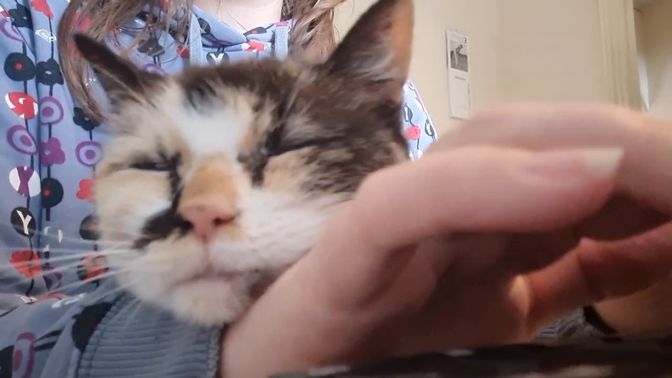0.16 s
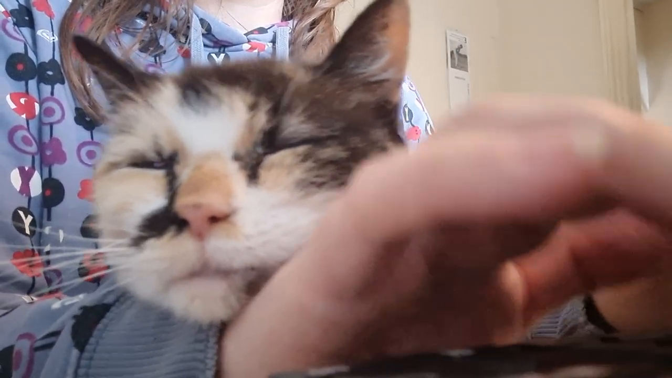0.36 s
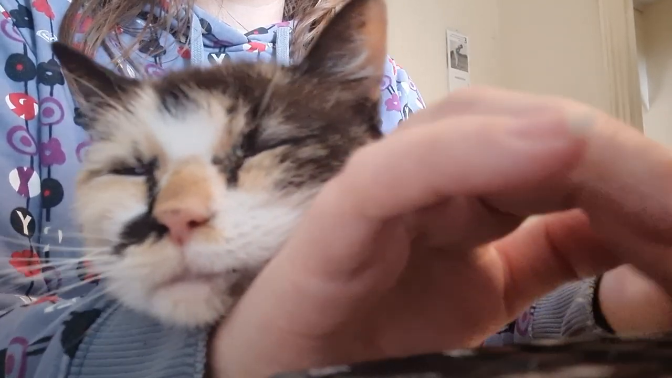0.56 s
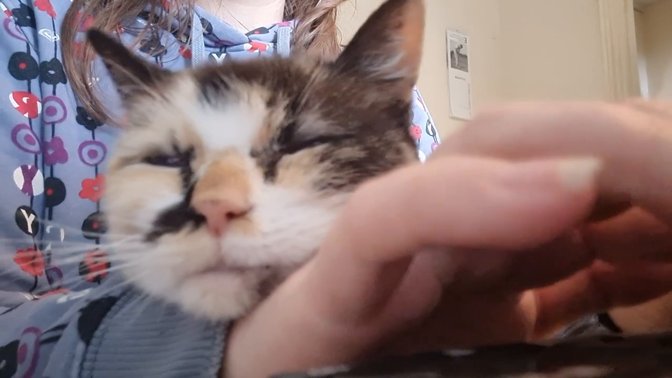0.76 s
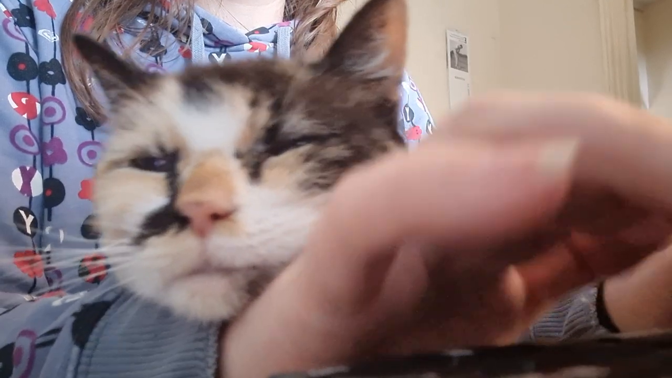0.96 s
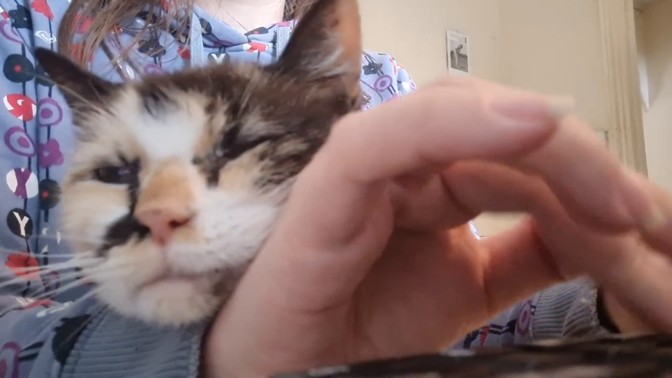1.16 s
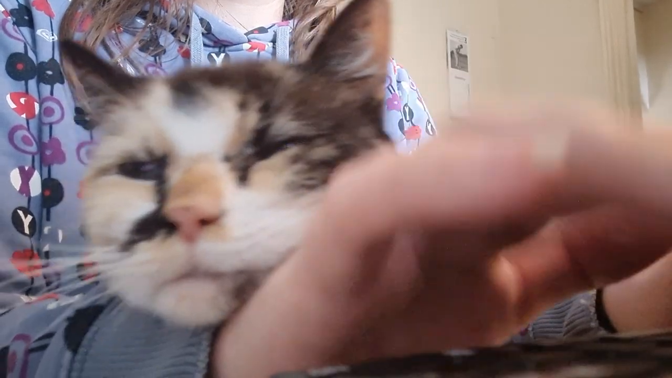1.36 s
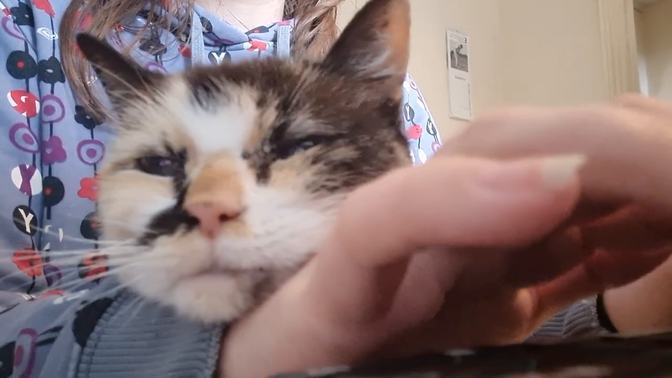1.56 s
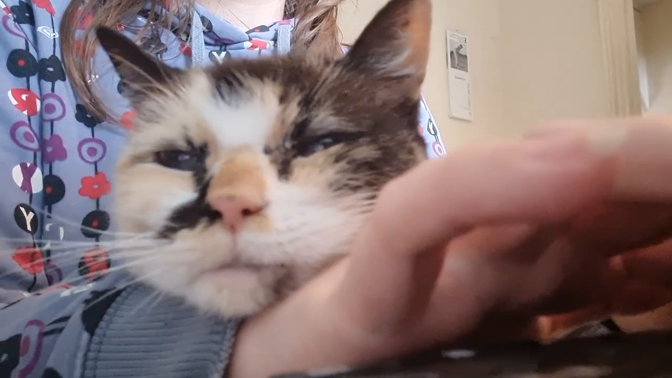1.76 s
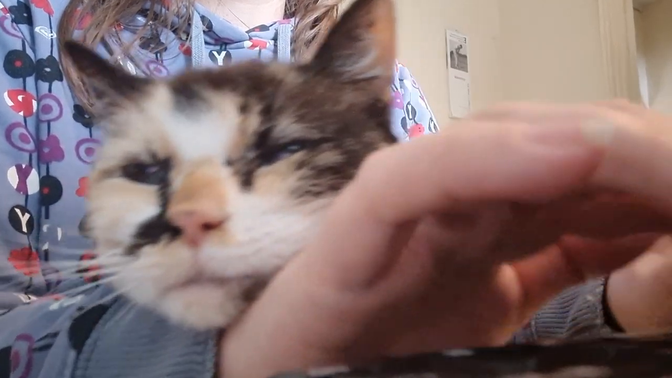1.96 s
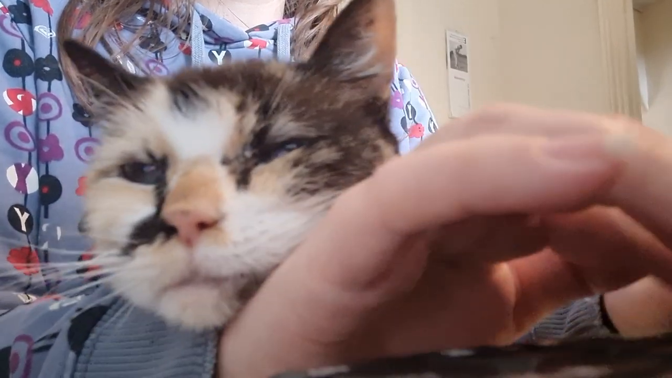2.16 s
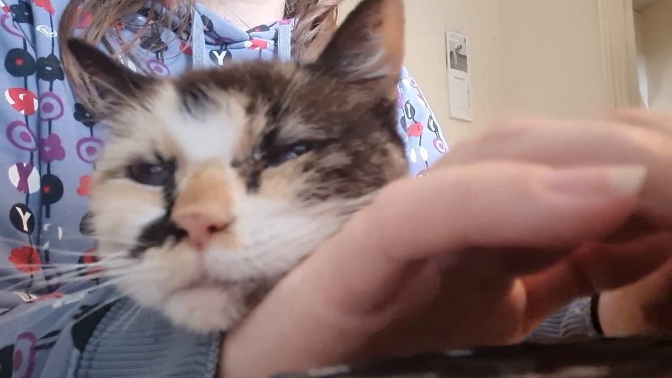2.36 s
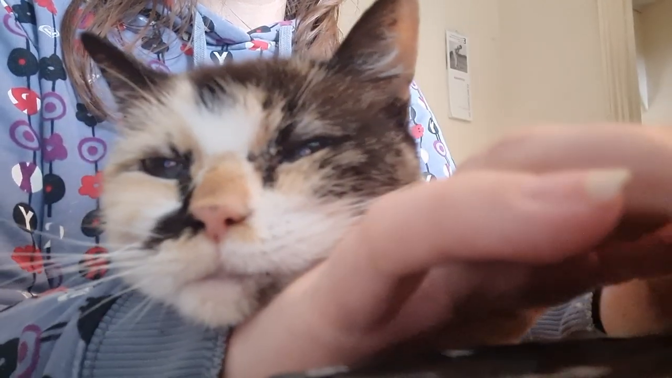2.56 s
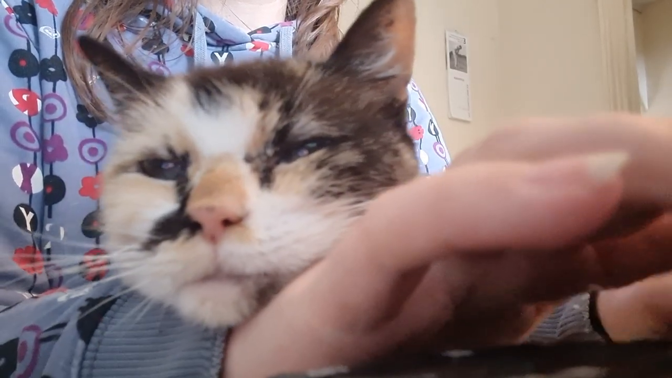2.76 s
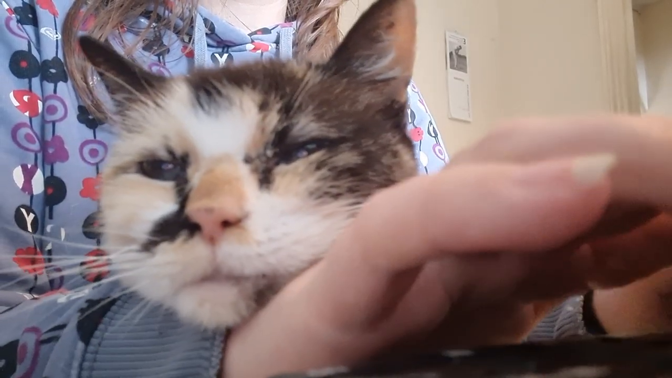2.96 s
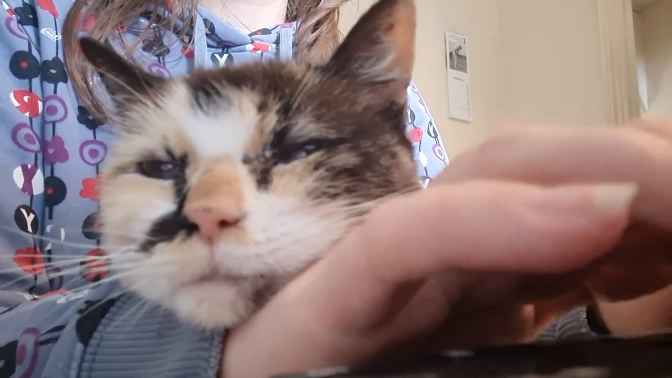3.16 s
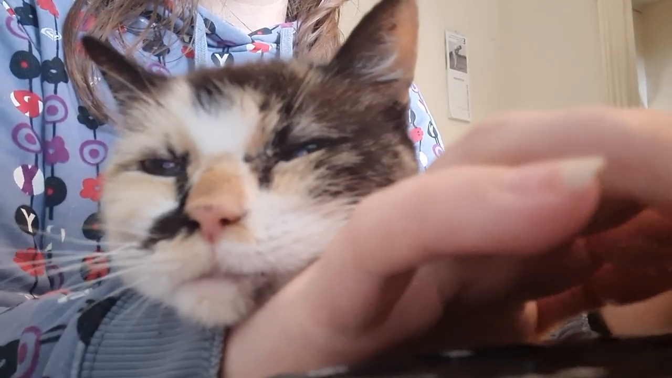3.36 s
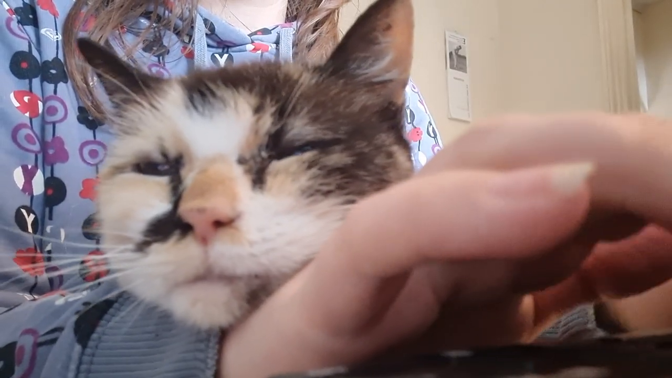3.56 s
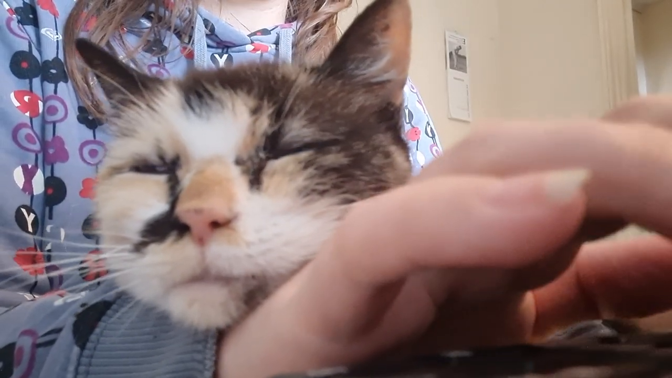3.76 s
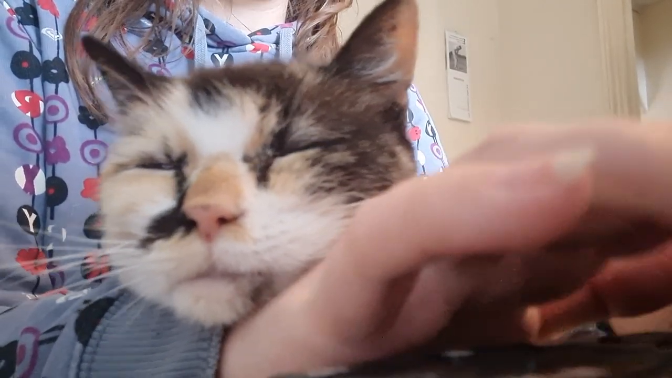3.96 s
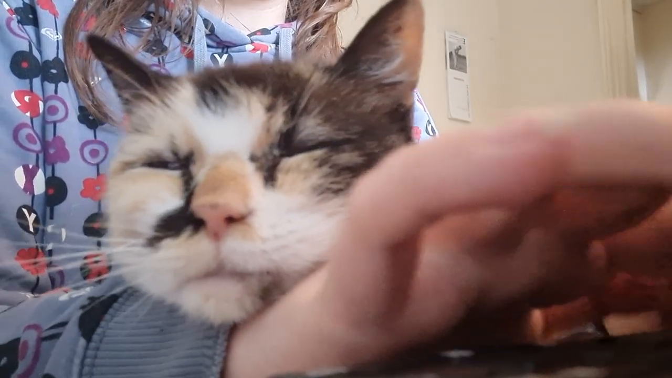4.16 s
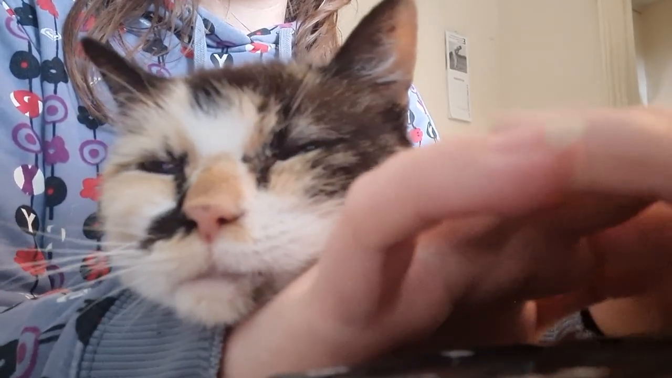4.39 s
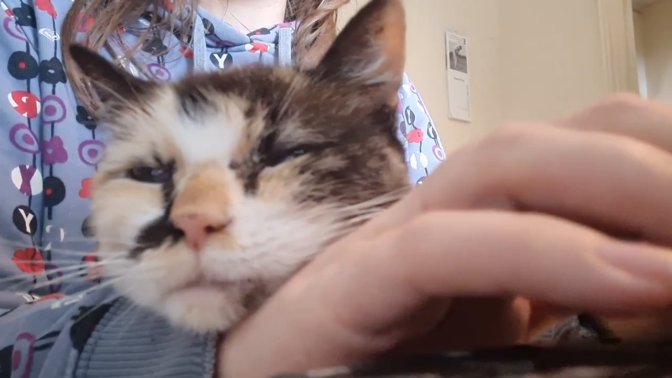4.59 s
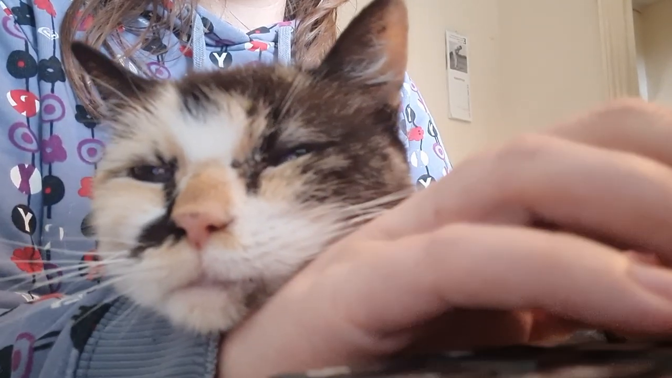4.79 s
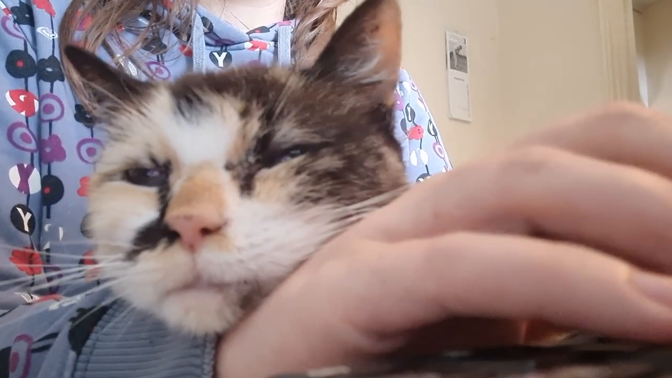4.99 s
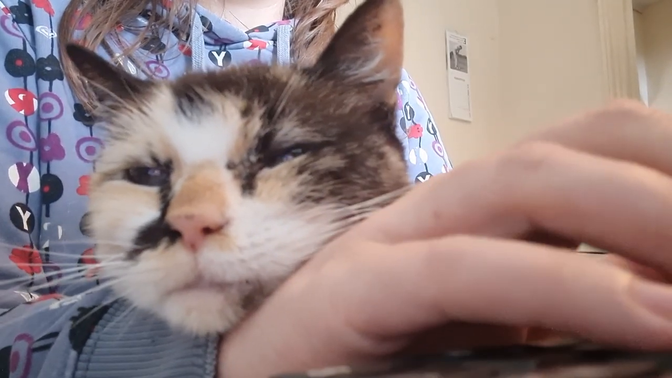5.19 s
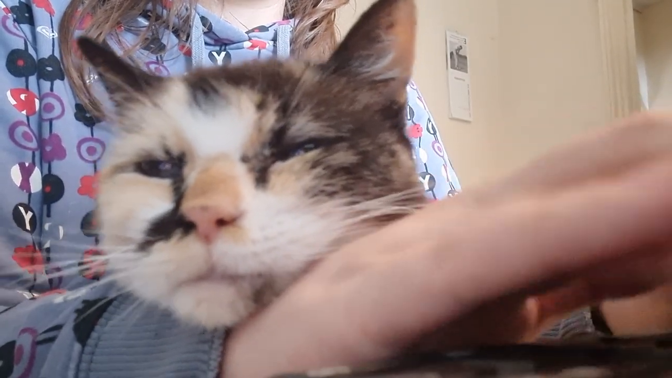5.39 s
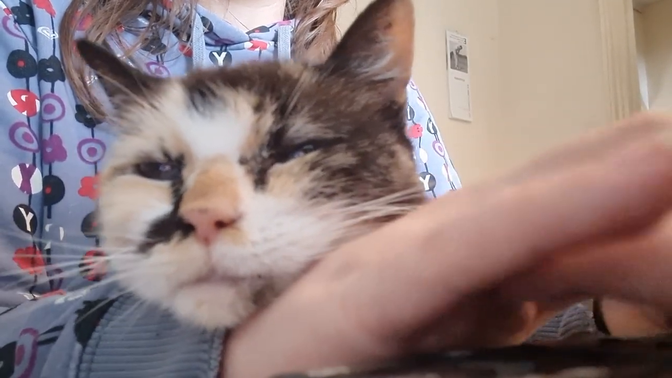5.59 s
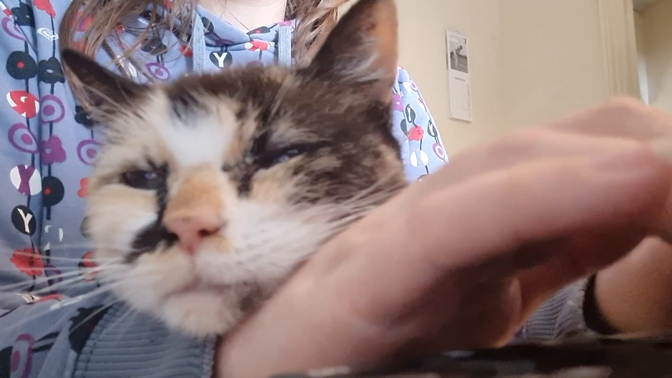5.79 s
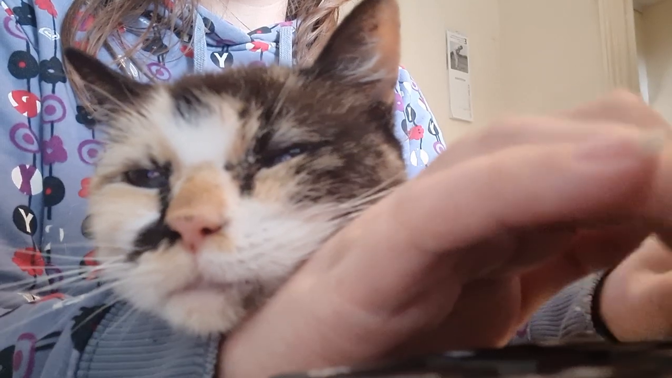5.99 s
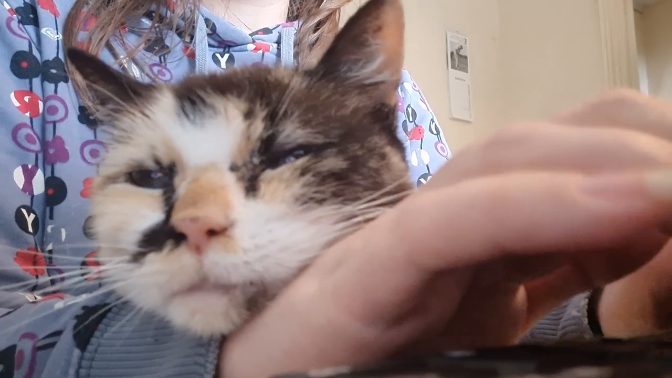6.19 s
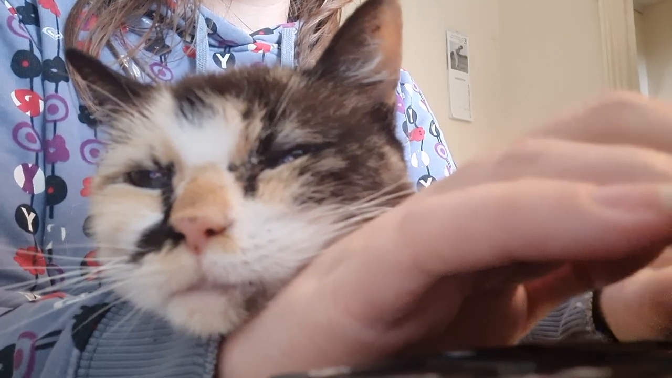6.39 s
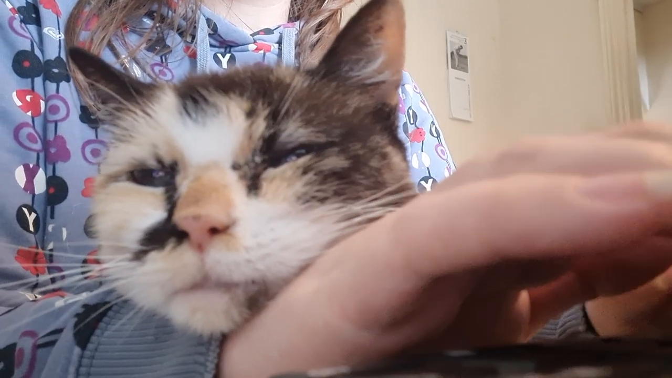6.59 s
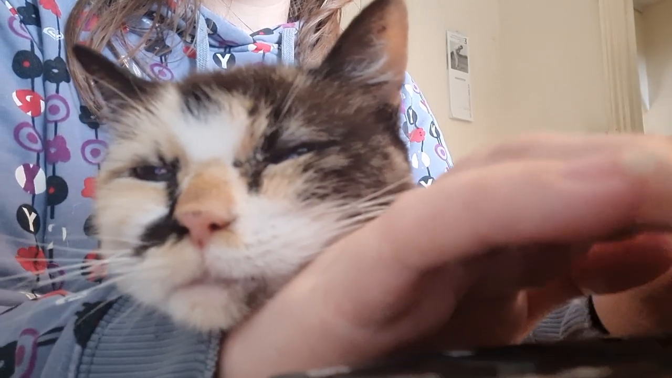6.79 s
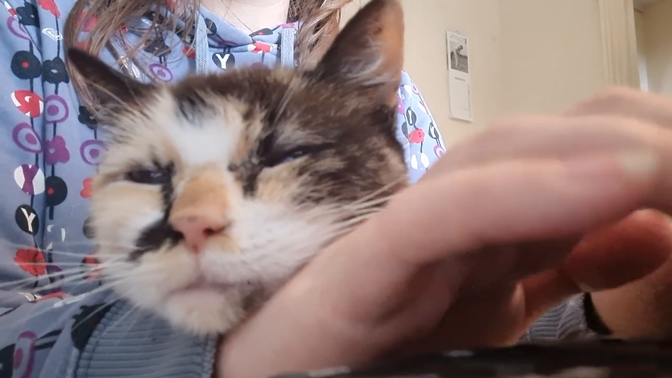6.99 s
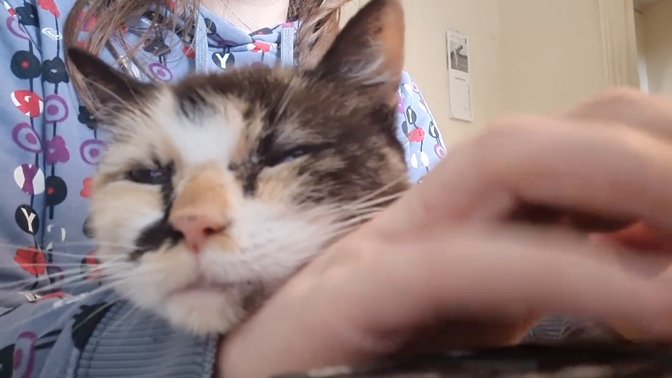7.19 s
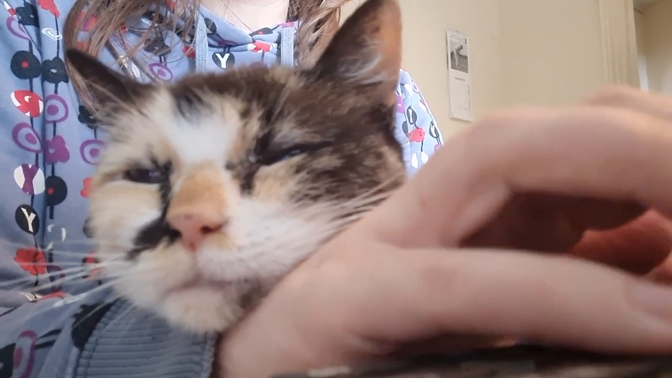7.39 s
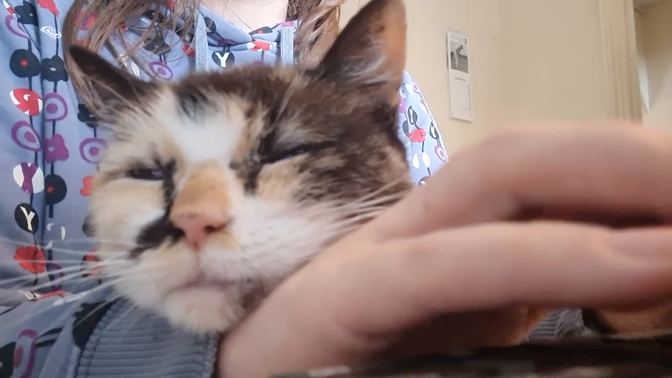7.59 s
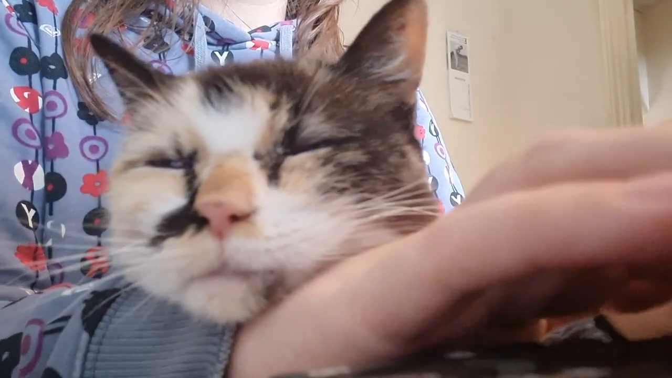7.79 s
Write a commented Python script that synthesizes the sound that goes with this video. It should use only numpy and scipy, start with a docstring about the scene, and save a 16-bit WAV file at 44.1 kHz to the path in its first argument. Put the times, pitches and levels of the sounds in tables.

```python
"""Over the hush of a small room, a cat purrs close by: its vocal folds slap in loud, uneven pops as it
breathes out. Almost at once typing starts on the right: key caps click and rattle, the case rings and
the desk thumps. At 1.3 s the cat breathes in, with faint, even pops. The typing breaks off near 3 s,
then picks up as the cat breathes out again from 3.4 s. Both ease off near 5 s. The keys return at
5.5 s, pause as a last out-breath begins at 7 s, and join it to the end."""
import sys
import numpy as np
from scipy import signal
from scipy.fft import rfft, irfft
from scipy.io import wavfile

SR = 44100
rng = np.random.default_rng(int(sys.argv[2]) if len(sys.argv) > 2 else 0)


def unload_wav(signal):
    """Save mono or channel-first audio to the path in sys.argv[1] as 16-bit WAV at rate SR, clipped to [-1, 1]."""
    wavfile.write(
        sys.argv[1],
        SR,
        np.round(np.clip(np.atleast_2d(signal).T, -1, 1) * 32767).astype(np.int16),
    )


N = 345744
TIME = np.arange(N) / SR

# The tone of the background noise. Each row: frequency in Hz, relative level in dB.
HUSH_SPECTRUM = [(18, -31.5), (30, -1.5), (53, -2.5), (88, -3), (141, -1), (239, -8.5), (649, -23),
                 (1160, -31), (2010, -41), (2230, -31), (5170, -33), (14800, -30), (16000, -36.5)]
# How fast the cat's voice box twitches. Each row: start in seconds, twitches per second.
TWITCH_RATES = [(0, 26.67), (.7, 25.07), (.84, 27.29), (1.26, 25.81), (3.08, 26.39), (4.62, 25.52),
                (5.46, 25.47), (7.0, 27.38), (7.42, 26.0)]
# The cat's out-breaths. Each row: start, swell time, start of fade and fade time, all in seconds,
# then relative level in dB.
OUT_BREATHS = [(.02, .06, 1.08, .22, -42), (3.4, .33, 4.9, .03, -41.5), (7.035, .02, 7.9, .03, -43)]
# How the cat's airways ring. Each row: pitch in Hz, width in Hz, relative level in dB.
THROAT_MODES = [(154, 160, -1), (240, 265, 6.5), (482, 910, -3.5)]
MOUTH_MODES = [(766, 129, -21), (1253, 270, -12)]
NOSE_MODES = [(6590, 610, -33)]
# Key contacts. Each row: time in seconds, click level in dB, cap pitch in Hz, then the levels of
# stem, case and desk thump in dB. Levels are relative within each column.
KEY_CONTACTS = [(0.0372, -42.5, 1340, -69, -50, -47), (0.0705, -43, 1200, -71, -42, -54.5),
                (0.2328, -47, 1210, -70, -46, -53), (0.2533, -30.5, 1410, -44, -42, -45),
                (0.3224, -43, 1770, -61, -71, -53), (0.3324, -41, 1280, -82, -51, -48.5),
                (0.3945, -44.5, 2700, -60, -56, -57.5), (0.4478, -33.5, 2000, -55, -46, -64),
                (0.539, -49.5, 2900, -68, -60, -54), (0.5642, -47.5, 1830, -75, -67, -43),
                (0.5943, -35.5, 2680, -60, -52, -57), (0.6674, -48, 3020, -71, -60, -41),
                (0.6811, -38.5, 1810, -61, -60, -42.5), (0.7032, -46.5, 2840, -63, -63, -44),
                (0.7967, -39.5, 1200, -50.5, -42.5, -51), (0.8346, -26, 4130, -38, -35.5, -53),
                (0.915, -25.5, 3040, -41, -45, -55), (0.9485, -29.5, 2530, -44, -33.5, -50),
                (0.9822, -47, 1380, -56, -57, -53), (1.0429, -37, 1700, -60, -57, -55),
                (1.0518, -30, 1960, -47.5, -48, -61), (1.2253, -38.5, 1330, -46.5, -44.5, -50),
                (1.275, -25.5, 1910, -33.5, -45, -46), (1.287, -32, 1540, -37, -58, -47),
                (1.3403, -43, 1490, -44, -53, -55), (1.3603, -38.5, 2680, -58, -49.5, -50),
                (1.3721, -33.5, 2980, -37, -39.5, -55.5), (1.3871, -43, 2940, -58, -59, -64),
                (1.474, -23.5, 2460, -40, -37, -45), (1.5493, -30, 2900, -60, -47, -60),
                (1.5864, -29.5, 1300, -53, -46, -47), (1.606, -35, 2020, -55, -61, -58),
                (1.6508, -40, 2660, -59, -43, -52), (1.6652, -31, 2360, -49, -60, -68),
                (1.738, -46.5, 2360, -61, -64, -51), (1.7731, -31.5, 1900, -64, -47, -47),
                (1.8045, -30, 2730, -48, -54, -55), (1.8457, -33.5, 2900, -61, -56, -46),
                (1.934, -42, 1490, -59, -56, -45.5), (1.9681, -43.5, 2560, -63, -62, -55),
                (2.032, -48, 1610, -57, -58, -62), (2.0478, -38.5, 1550, -55, -54, -55.5),
                (2.0911, -34, 2740, -66, -53, -50.5), (2.136, -39.5, 1250, -53.5, -60, -53),
                (2.1688, -38, 1320, -45, -59, -53), (2.1856, -38, 2210, -54, -58, -49),
                (2.2802, -39.5, 1260, -63, -52, -45), (2.2922, -39.5, 1950, -45.5, -50.5, -43.5),
                (2.3805, -59.5, 1940, -61, -63, -56), (2.3997, -45.5, 1750, -55, -66, -53.5),
                (2.4501, -32.5, 2930, -40.5, -39.5, -45.5), (2.553, -42.5, 2600, -59, -58, -53),
                (2.595, -35, 1440, -54, -50, -62), (2.6322, -30, 2650, -59, -41, -48.5),
                (2.6696, -33, 1240, -41, -46, -43), (2.6981, -27, 2280, -38, -41.5, -45),
                (2.734, -33.5, 2500, -47, -55, -44), (2.7538, -36.5, 2020, -52, -67, -62),
                (2.771, -46, 2220, -74, -64, -54), (2.8305, -37.5, 2210, -52, -64, -53),
                (2.8397, -34.5, 1580, -51, -62, -48), (2.929, -33.5, 1350, -40, -39, -54),
                (2.942, -33, 3020, -37, -50, -59), (2.9594, -42.5, 2940, -41.5, -52, -51),
                (3.2685, -73, 1260, -92, -73, -79), (3.329, -51, 1910, -76, -71, -64),
                (3.342, -36, 2640, -54, -48.5, -51), (3.4338, -44, 1950, -59, -59, -58),
                (3.4504, -33.5, 1670, -49, -52, -54), (3.5248, -33.5, 2890, -59, -59, -63),
                (3.8905, -39, 1210, -58, -59, -62), (3.93, -53, 1270, -67, -44, -50.5),
                (3.961, -33.5, 1210, -63, -50, -51), (4.0617, -37.5, 1850, -56, -55, -57),
                (4.0826, -30.5, 1900, -50, -52, -60), (4.1346, -23.5, 2960, -43.5, -41, -51),
                (4.1694, -32.5, 2930, -50, -55, -48), (4.2233, -34, 1910, -55, -51, -54),
                (4.2423, -30, 1340, -44.5, -36, -44.5), (4.3116, -47, 1220, -59, -44, -57),
                (4.3562, -29, 1670, -41, -51, -51), (4.3836, -43, 2290, -61, -49, -54),
                (4.4497, -23, 3500, -32.5, -40, -62), (4.4962, -41, 1290, -54, -43, -56),
                (4.5362, -46, 2000, -57, -48, -55), (4.5466, -41, 2680, -47, -55, -51),
                (4.6782, -23, 2170, -34, -44, -57), (4.7767, -40, 1430, -48, -41, -44),
                (4.794, -34, 2070, -42, -42, -50), (4.8051, -32.5, 1660, -46, -50, -55),
                (4.8491, -22.5, 3000, -42.5, -40, -62), (4.8708, -37.5, 2840, -56, -60, -58),
                (4.8888, -42, 2910, -57, -49, -63.5), (4.9016, -33.5, 1680, -48, -51, -51),
                (4.9169, -31.5, 1750, -49, -34.5, -53), (4.9228, -26.5, 2930, -26, -53, -51),
                (4.9398, -38.5, 1460, -38, -50, -60), (4.9567, -41, 1725, -58, -50.5, -59.5),
                (5.252, -77, 2190, -92, -88, -77), (5.3652, -67.5, 1970, -91.5, -84, -80),
                (5.5084, -39, 2460, -52, -53, -79), (5.5672, -32.5, 2840, -58, -49, -52),
                (5.6009, -48, 1400, -60, -47, -55), (5.6368, -26, 2010, -43, -55, -44),
                (5.674, -37, 2960, -51, -53, -53), (5.691, -29, 1480, -49.5, -45.5, -53),
                (5.7329, -39.5, 2340, -54.5, -53, -64), (5.7447, -36, 2100, -42, -57, -50),
                (5.7906, -52.5, 2160, -61, -57, -55), (5.8838, -26, 2640, -37, -33.5, -51),
                (5.915, -34, 1350, -54, -47, -48), (5.9395, -29.5, 1930, -43, -52, -53),
                (5.9698, -33.5, 1980, -49, -46, -56), (5.9998, -29.5, 2140, -56, -45, -52),
                (6.0175, -28, 2700, -37.5, -45, -49.5), (6.0445, -43.5, 2000, -53, -51, -48.5),
                (6.0975, -39.5, 2760, -55, -65, -52), (6.1723, -26.5, 2920, -42.5, -36, -56),
                (6.2018, -26.5, 1200, -39, -51, -42), (6.2797, -43.5, 1960, -57, -61, -56),
                (6.3228, -33, 2330, -47, -55, -53), (6.3847, -39.5, 1390, -44, -52, -42),
                (6.4065, -22.5, 2020, -35.5, -34.5, -46), (6.4301, -41, 2860, -54, -56, -49),
                (6.4658, -37.5, 2050, -45.5, -37, -50), (6.5151, -32.5, 2160, -42.5, -45, -59),
                (6.551, -44.5, 2120, -53, -51, -63), (6.5738, -29, 1390, -38, -37.5, -49),
                (6.5942, -45, 1740, -45, -56, -53), (6.653, -21.5, 2790, -32, -46, -40.5),
                (6.6782, -35, 2600, -58, -50, -54), (6.6917, -39, 2050, -42.5, -46, -54.5),
                (6.7267, -48, 1630, -65, -67, -61), (6.7394, -35, 1490, -55, -59, -57),
                (6.7522, -34, 2820, -57, -49, -64), (6.7935, -36.5, 1370, -49, -59, -52.5),
                (6.8671, -44, 1740, -62, -62, -68), (6.8851, -44.5, 2470, -60, -60.5, -68.5),
                (6.9293, -66.5, 2880, -81, -72, -80), (7.2078, -52.5, 1520, -58, -47.5, -43),
                (7.224, -34, 1660, -47, -44, -47), (7.3081, -28, 1260, -45.5, -50, -54),
                (7.339, -32, 2870, -45, -44, -48), (7.3567, -37, 1200, -53, -48, -51),
                (7.4226, -23, 2880, -41, -50, -59), (7.446, -31.5, 2130, -51, -53, -48),
                (7.4575, -29.5, 2700, -38.5, -38, -52), (7.5226, -49, 1860, -59, -62, -50),
                (7.5322, -39, 1200, -51.5, -47, -51), (7.665, -28.5, 1260, -49, -55, -44),
                (7.6831, -23.5, 1530, -45, -50, -37), (7.697, -34.5, 2969, -60, -49, -55),
                (7.7531, -34, 2710, -47, -63, -53), (7.7694, -38.5, 1310, -59, -52, -52),
                (7.797, -30.5, 1290, -49, -45.5, -39), (7.8115, -29, 2080, -40.5, -42.5, -35)]
# How keyboard parts and desk ring. Each row: pitch in Hz, width in Hz, relative level in dB.
CAP_MODES = [(1990, 840, 4.5), (2430, 970, 3.5), (2800, 464, 0.5), (3860, 810, -1.5), (4077, 690, -3.5)]
CASE_MODES = [(538, 180, 0.5), (715, 120, -2.5), (1060, 560, 0.5), (1273, 226, 0.5), (1370, 350, -1.5)]
STEM_MODES = [(4880, 590, -7.5), (6600, 1000, -7.5), (7950, 1300, 2), (9800, 4100, 3), (10250, 2200, 4),
              (14400, 3800, 3), (15600, 1400, -3)]
DESK_MODES = [(52, 17, -1), (116, 21, 2), (141, 23, -6.5), (243.6, 29, -0.5)]
# When the hands are busy. Each row: start in seconds, end in seconds, relative rustle level in dB.
TYPING_RUNS = [(0.194, 1.1, -66.5), (1.22, 2.951, -64), (3.324, 3.58, -77), (3.87, 4.934, -65),
               (5.61, 6.807, -62), (7.203, 7.9, -68.5)]


def amp(db):
    """Turn decibels into a number to multiply by."""
    return 10 ** (np.asarray(db) / 20)


def resonance(x, hz, width_hz):
    """Ring at one pitch; the narrower the width, the longer the ring."""
    decay, angle = np.exp(-np.pi * width_hz / SR), 2 * np.pi * hz / SR
    return signal.lfilter([0, np.sin(angle)], [1, -2 * decay * np.cos(angle), decay ** 2], x + 1e-18)


def body(x, modes):
    """An object rings at several pitches, its modes; every second one is added upside down."""
    return sum((-1) ** k * amp(db) * resonance(x, hz, width) for k, (hz, width, db) in enumerate(modes))


def touched(hit, modes, spread_db):
    """Ring the modes with random strengths, keeping the total energy of the hit."""
    rung = body(hit, [(hz, width, db + spread_db * rng.standard_normal()) for hz, width, db in modes])
    return rung * np.sqrt(np.sum(hit ** 2, axis=1) / np.sum(rung ** 2, axis=1))[:, None]


def cut(x, hz, kind, order):
    """Keep the "low" or the "high" side of a frequency."""
    return signal.sosfilt(signal.butter(order, hz, kind, fs=SR, output="sos"), x)


def add(out, at_s, piece):
    """Mix a short piece in at a given time."""
    i = max(round(at_s * SR), 0)
    out[..., i:i + piece.shape[-1]] += piece[..., :max(N - i, 0)]


def burst(rise_s, grain_db):
    """A puff of grainy stereo noise that swells over the rise time and dies away."""
    age = np.arange(2400) / SR / rise_s
    noise = rng.standard_normal((2, len(age))) * amp(grain_db * np.repeat(rng.standard_normal(100), 24))
    return noise / np.sqrt(np.mean(noise ** 2)) * (age * np.exp(1 - age)) ** 4


def hush():
    """Steady room and microphone noise, partly shared by left and right."""
    hz, db = np.transpose(HUSH_SPECTRUM)
    gain = amp(np.interp(np.log(np.fft.rfftfreq(N, 1 / SR) + 1), np.log(hz), db))
    shared, side = irfft(rfft(rng.standard_normal((2, N))) * gain, N)
    return amp(-79) / np.std(shared) * (shared * amp([[-1.5], [1.5]]) + 0.95 * side * [[1], [-1]])


def fold_pops(times_s, jitter_s, db, spread_db):
    """The vocal folds slap: one spike for each time, a little uneven in timing and strength."""
    timing, strength = rng.standard_normal((2, len(times_s)))
    at = ((times_s + jitter_s * timing) * SR).astype(int)
    pops = np.zeros(N)
    pops[np.clip(at, 0, N - 1)] = amp(db + spread_db * strength)
    return pops


def out_breaths(waver_db=1.5, wavers_per_s=12):
    """How hard the cat breathes out: each breath swells, holds and fades, wavering slightly."""
    effort = np.zeros(N)
    for start, swell, fade_at, fade, db in OUT_BREATHS:
        end = fade_at + fade
        shape_db = np.interp(TIME, [start, start + swell, fade_at, end], [-8.5, 0, 0, -13.5])
        effort += amp(db + shape_db) * (TIME > start) * (TIME < end)
    waver = np.interp(TIME, np.arange(200) / wavers_per_s, rng.standard_normal(200))
    return effort * amp(waver_db * waver)


def purr():
    """Each twitch of the voice box lets the folds slap, ringing the throat, mouth and nose."""
    starts, rates = np.transpose(TWITCH_RATES)
    cycles = np.cumsum(rates[np.searchsorted(starts, TIME, "right") - 1]) / SR
    twitch_s = .005 + np.interp(np.arange(int(cycles[-1])), cycles, TIME)
    main = fold_pops(twitch_s, jitter_s=.0018, db=0, spread_db=3.5)
    early = fold_pops(twitch_s - .011, jitter_s=.003, db=-6.5, spread_db=5)
    stray = fold_pops(twitch_s + .012, jitter_s=.008, db=-12, spread_db=5)
    pops, effort = main + early + stray, out_breaths()
    flutter = amp(-39.5) * rng.standard_normal(N)  # air slips through the half-shut folds
    # Faint main pops never stop: they are the purr heard on the in-breath.
    pressure = amp(16) * effort * (pops + flutter) + amp(-62) * (main + flutter)
    slap = effort * (pops + 0.32 * flutter) + amp(-71) * main
    # The sharp slap falls in the middle of the slower pressure swing, no two alike.
    slap = amp(13 + 2.2 * rng.standard_normal(N)) * np.roll(slap, 55)
    throat = cut(cut(body(pressure, THROAT_MODES), 91, "high", order=2), 430, "low", order=2)
    mouth = cut(body(slap, MOUTH_MODES), 1400, "low", order=3)
    nose = cut(body(slap, NOSE_MODES), 5000, "high", order=2)
    return throat + mouth + nose


def keyboard(usual_click_db=-35, usual_rise_s=.00245):
    """Each contact shakes its own cap, nearby caps, stems and case; loose keys rattle after it."""
    clicks, loose = np.zeros((2, 2, N))
    for at_s, click_db, cap_hz, stem_db, case_db, _ in KEY_CONTACTS:
        pan, length = rng.standard_normal(2)
        sides = amp(np.array([[.5], [-.5]]) * (-11 + 4.5 * pan))  # louder on the right
        force_db = click_db - usual_click_db
        rise_s = usual_rise_s * np.exp(.3 * length - .0117 * force_db)  # harder blows are shorter
        lands_s = at_s + .0012 - rise_s
        hit = burst(rise_s, grain_db=2)
        lag = rng.integers(14, 46)  # samples: sound reaches the left late, around the case
        hit[0] = 0.68 * np.roll(hit[1], lag) + 0.91 * hit[0]
        hit *= sides
        caps = amp(click_db - 5) * touched(hit, [(cap_hz, 550, 13)] + CAP_MODES, spread_db=5.5)
        case = amp(case_db + 2.5) * touched(hit, CASE_MODES, spread_db=3.5)
        stem = amp(stem_db - 3) * touched(hit, STEM_MODES, spread_db=4.5)
        add(clicks, lands_s, caps + case)
        add(clicks, lands_s - .0007, stem)  # the stem scrapes just before the cap lands
        shake = amp(-54.5 + .69 * force_db) * burst(.012, grain_db=6)
        lead_in = amp(click_db - 21.5) * burst(.0099, grain_db=.5)
        add(loose, at_s - .003, sides * shake)
        add(loose, at_s - .009, sides * lead_in)  # a faint hiss swells just before each click
    rattle = amp(-2.5) * touched(loose, CAP_MODES, spread_db=2)
    rattle += amp(-6.5) * touched(loose, CASE_MODES, spread_db=4.5)
    rattle += amp(-14) * touched(loose, STEM_MODES, spread_db=10.5)
    return clicks + rattle


def desk_thumps():
    """The finger behind each contact pushes the desk top softly and unevenly."""
    push = np.zeros((2, N))
    for at_s, *_, thump_db in KEY_CONTACTS:
        add(push, at_s - .004, amp(thump_db - 25.5) * burst(.011, grain_db=5.5))
    ringing = body(cut(push, 390, "low", order=2), DESK_MODES)
    near, far = cut(ringing, 39, "high", order=4)
    return np.array([amp(-8) * near + amp(-19) * far, amp(7.5) * near])


def hand_rustle(rest_db=-87, brushes_per_s=7.8):
    """Shifting hands and light, random brushes stir the caps, case and stems without a click."""
    busy_db = np.full(N, float(rest_db))
    for start, end, db in TYPING_RUNS:
        edges_s = [start - .055, start, end, end + .031]
        busy_db = np.maximum(busy_db, np.interp(TIME, edges_s, [rest_db, db, db, rest_db]))
    grains = amp(3.2 * np.repeat(rng.standard_normal(N // 60 + 1), 60)[:N])
    rub = rng.standard_normal((2, N)) * grains * amp(busy_db - 7)
    brushing = (rng.random(N) < brushes_per_s / SR) & (busy_db > rest_db + 20)
    for i in np.flatnonzero(brushing):
        brush = burst(.0057, grain_db=.5) * amp(busy_db[i] + 11.5 + 3 * rng.standard_normal())
        add(rub, i / SR, brush)
    rub *= amp([[-5.5], [3.5]])
    caps_and_case = touched(rub, CAP_MODES + CASE_MODES[2:], spread_db=11)
    return caps_and_case + amp(-15.5) * touched(rub, STEM_MODES, spread_db=0)


def room_echo(x, bass_fade_s=.3, treble_fade_s=.24, split_hz=2100):
    """Wall echoes blur into a tail that drops 60 dB in the fade time, the treble sooner."""
    t = np.arange(SR // 2) / SR
    bass, treble = rng.standard_normal((2, 2, len(t))) * np.minimum(t / .003, 1)
    tail = cut(bass, split_hz, "low", order=2) * amp(-60 * t / bass_fade_s)
    tail += amp(-2.5) * cut(treble, split_hz, "high", order=2) * amp(-60 * t / treble_fade_s)
    tail /= np.sqrt(np.sum(tail ** 2, axis=1))[:, None]
    return signal.fftconvolve(x[None], tail, axes=1)[:, :N]


def scene():
    """The cat is a little right of centre; keyboard and desk are far right."""
    cat, keys, thumps = purr(), keyboard() + hand_rustle(), desk_thumps()
    cat_stereo = np.array([np.roll(cat, 5), cat]) * amp([[-2.2], [1.8]])
    to_walls = amp(-16) * cat + amp(-15.5) * keys[1] + amp(-18) * thumps[1]
    echo = room_echo(to_walls) * amp([[-2.5], [1.5]])
    return cat_stereo + keys + thumps + echo + hush()


def record(dry):
    """Cut away the highest treble, above 15800 Hz."""
    return signal.sosfilt(signal.ellip(8, .5, 70, 15800, fs=SR, output="sos"), dry)


dry = scene()
out = record(dry)
unload_wav(out)
```